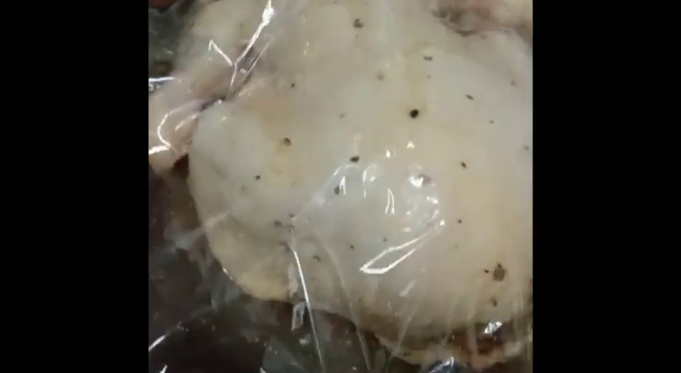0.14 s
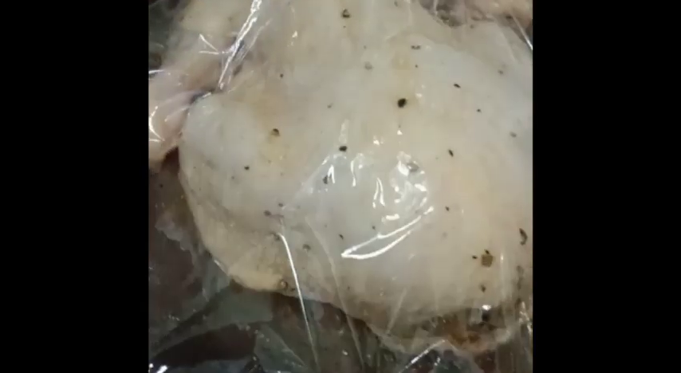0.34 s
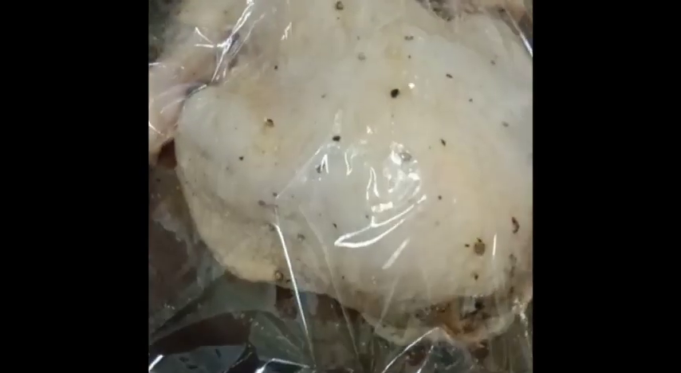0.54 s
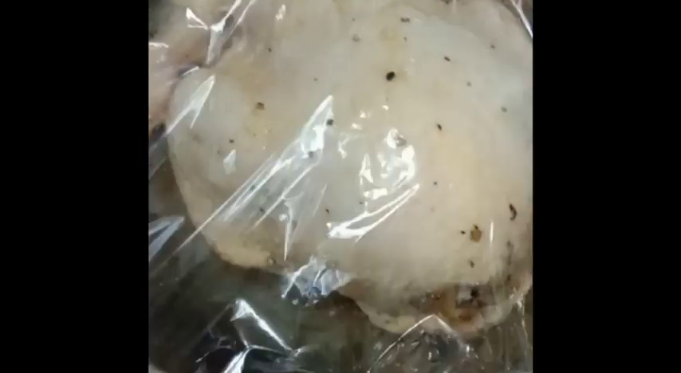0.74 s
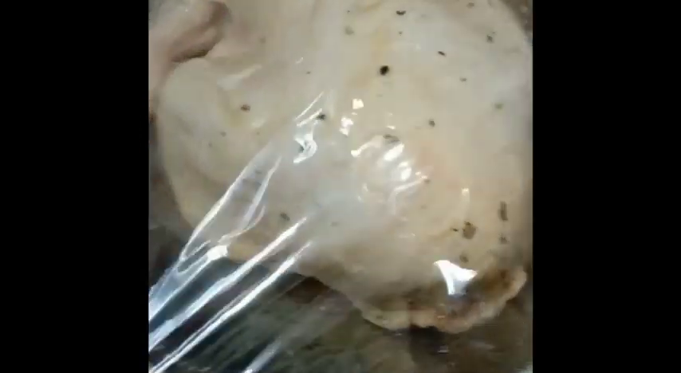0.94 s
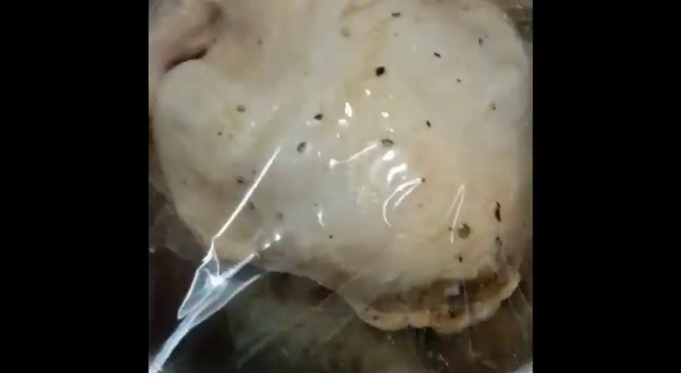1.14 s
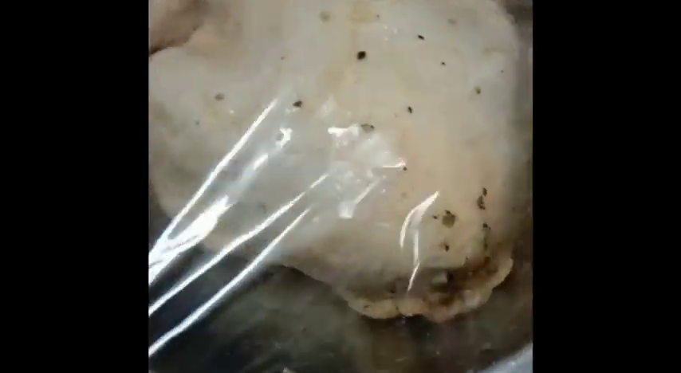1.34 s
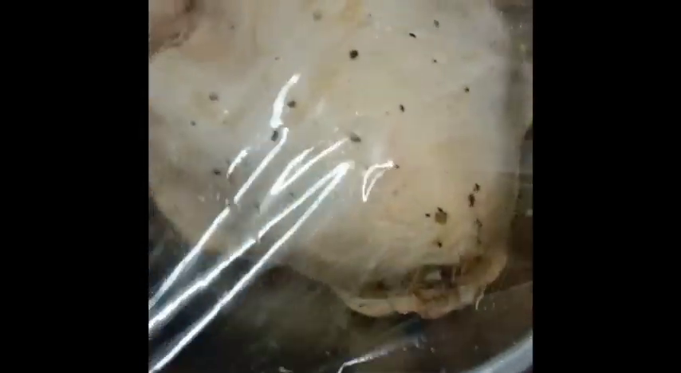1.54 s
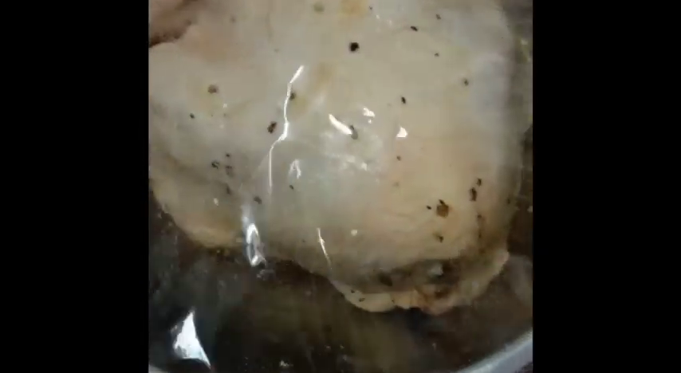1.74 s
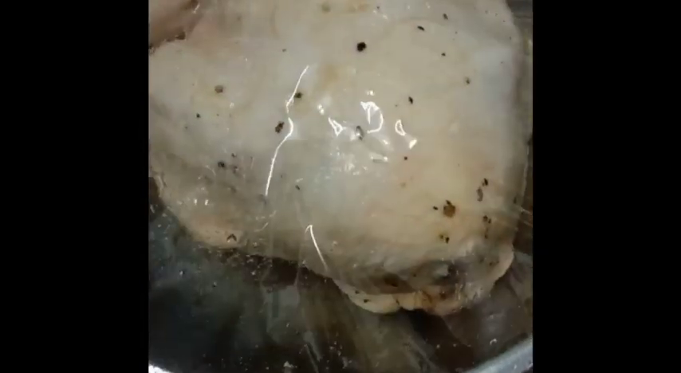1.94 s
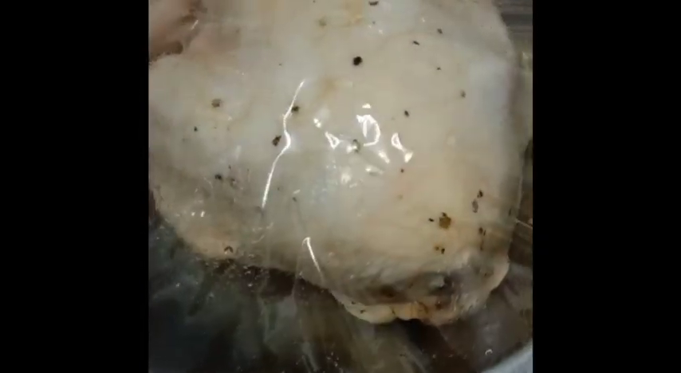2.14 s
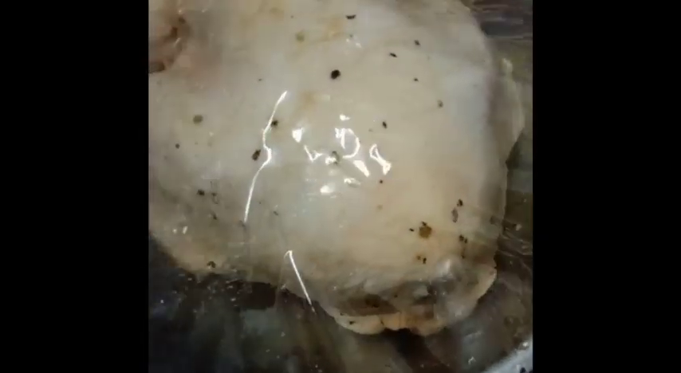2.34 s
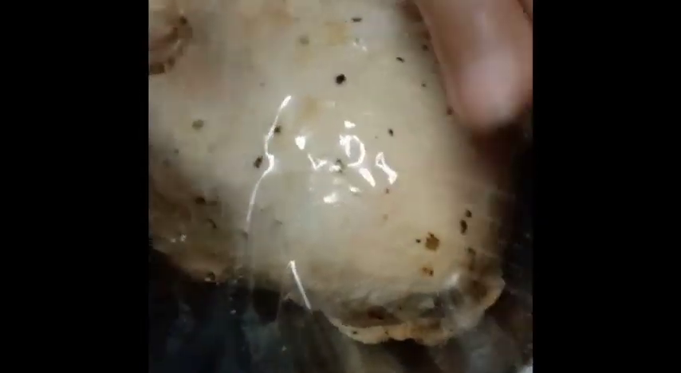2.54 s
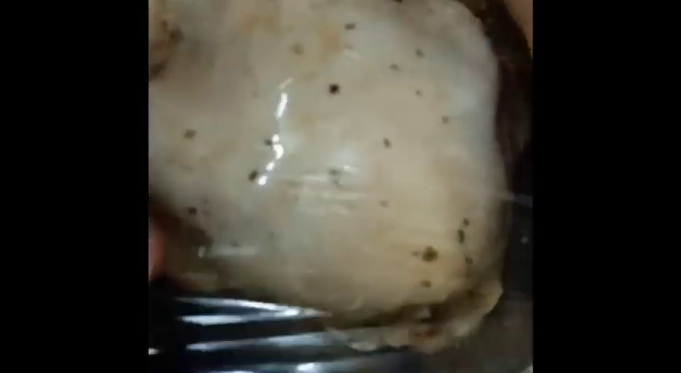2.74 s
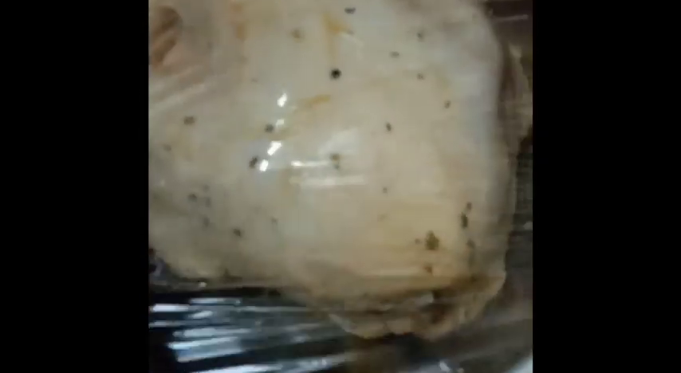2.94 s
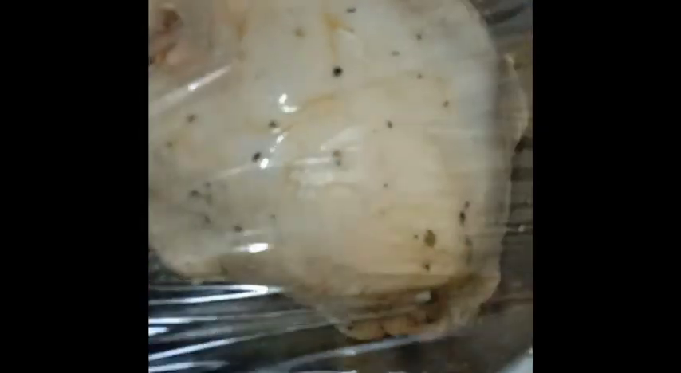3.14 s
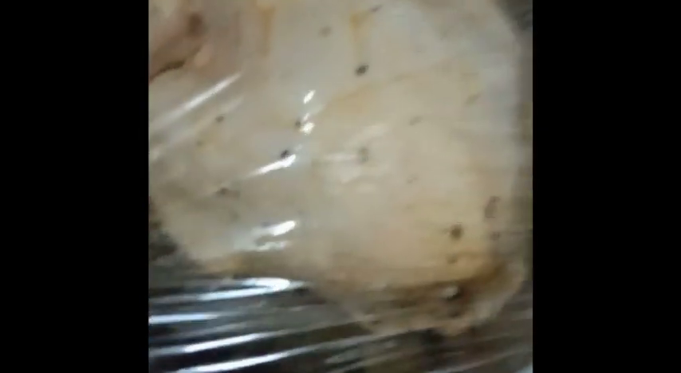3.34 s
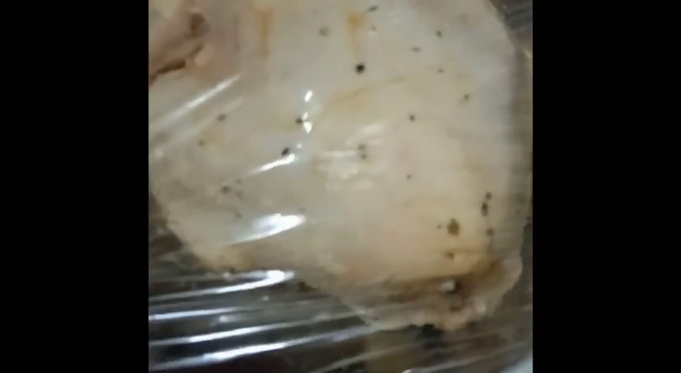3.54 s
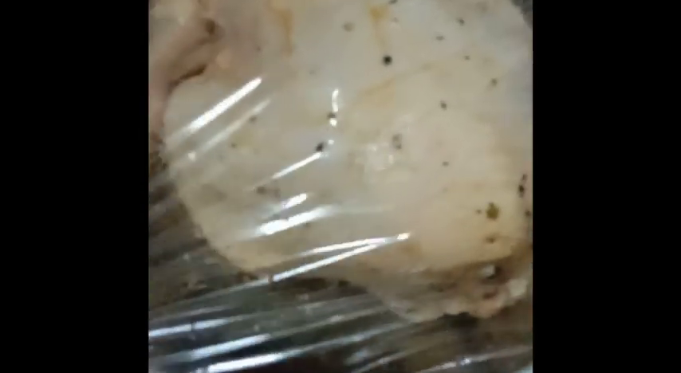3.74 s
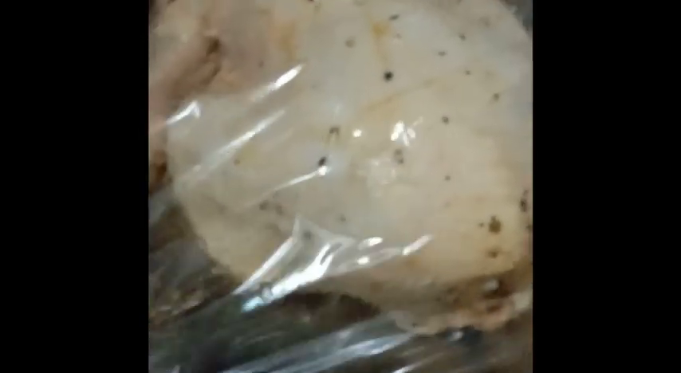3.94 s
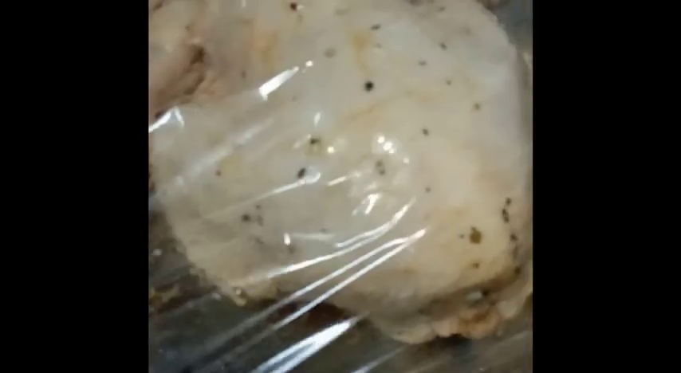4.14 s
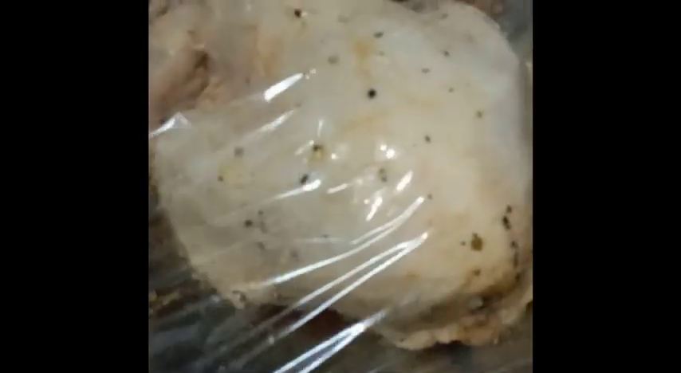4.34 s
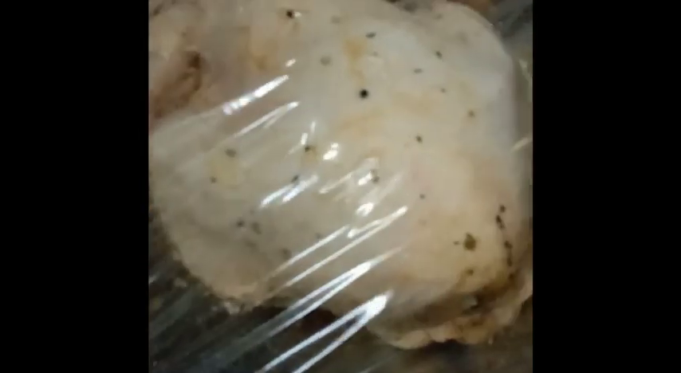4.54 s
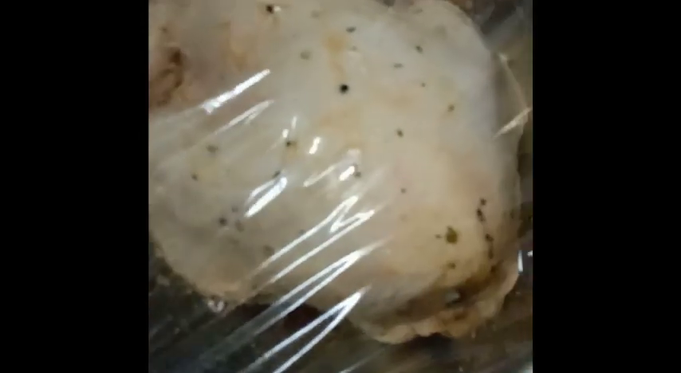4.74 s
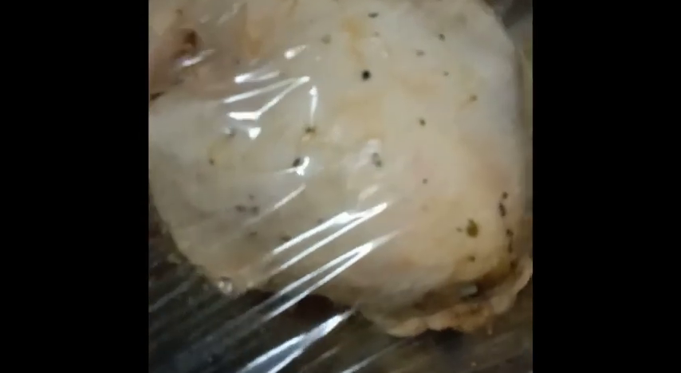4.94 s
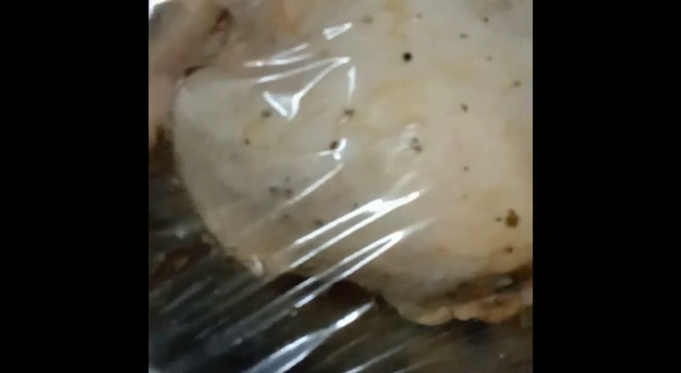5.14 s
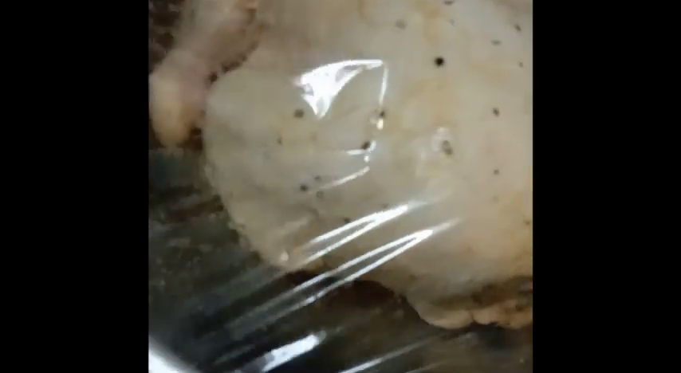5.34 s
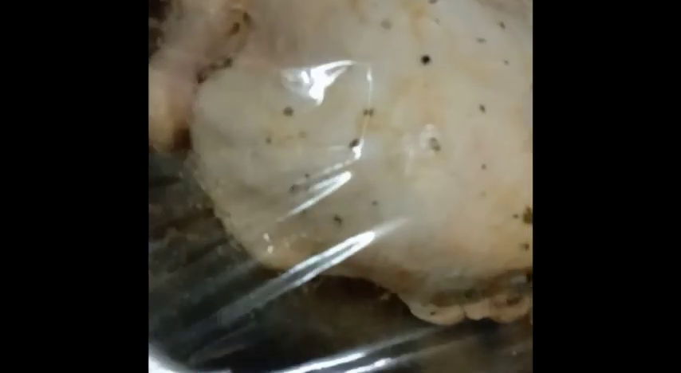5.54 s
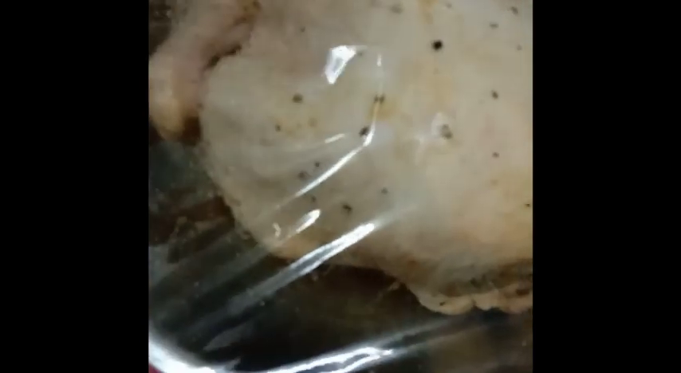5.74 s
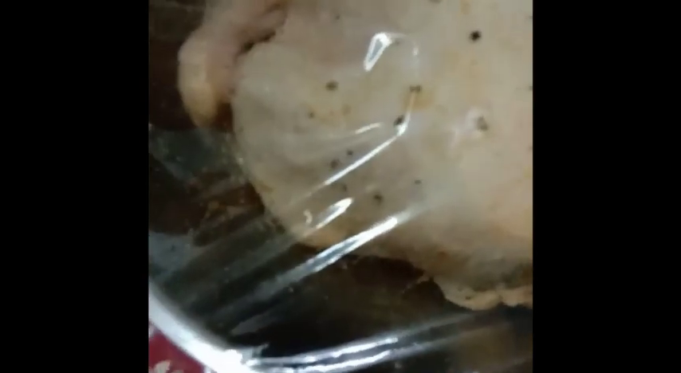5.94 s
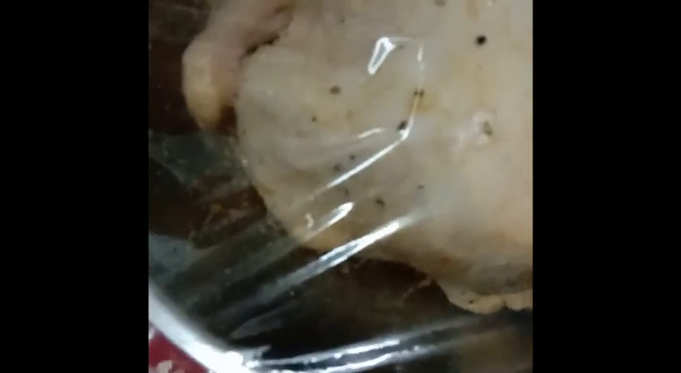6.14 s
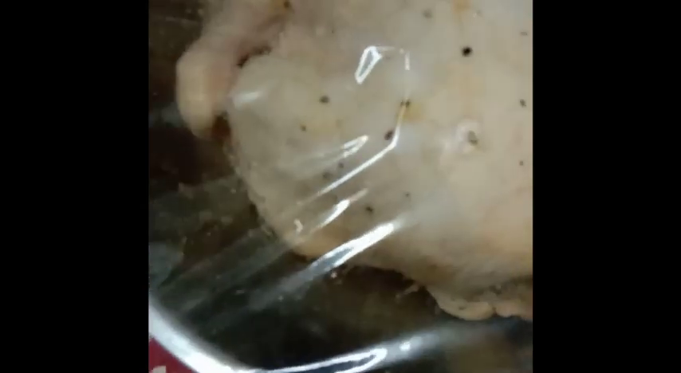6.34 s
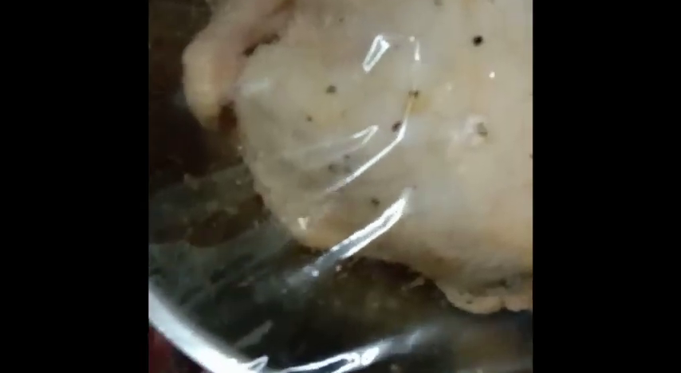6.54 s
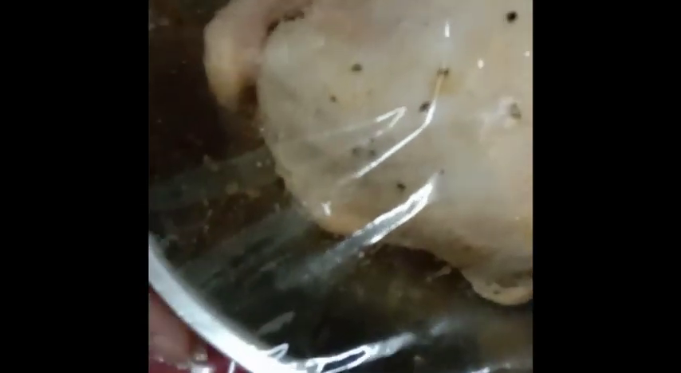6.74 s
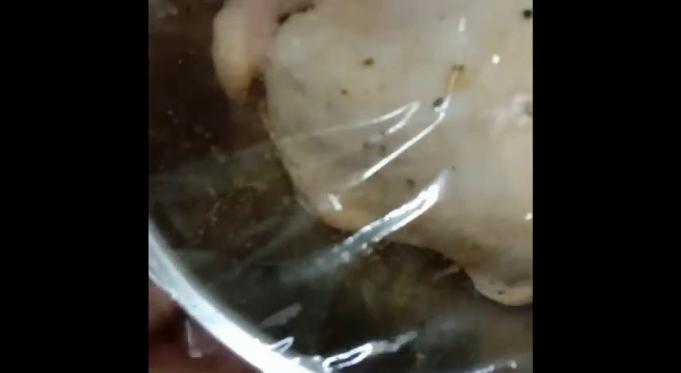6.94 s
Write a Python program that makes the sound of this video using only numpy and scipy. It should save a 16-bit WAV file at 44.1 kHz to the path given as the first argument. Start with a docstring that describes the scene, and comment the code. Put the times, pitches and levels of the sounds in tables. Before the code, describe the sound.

Plastic cling film is pulled over a metal bowl, close by in a small, quiet kitchen. It crinkles in swarms of tiny ticks and sharp snaps, with a hollow, papery ring from the taut sheet. After a lull of about a second, the pulls come thick and fast, with short peeling rasps, brief squeaks on the rim and faint bumps of the bowl. It ends mostly with crackle and snaps.

```python
"""Cling film is pulled and smoothed over a metal bowl in a small, quiet kitchen.
First, creases buckle in swarms of tiny ticks and a few loud snaps; the tight sheet answers like a
slack drum, and the hands nudge the bowl. After 1.5 s comes a lull. From about 2.8 s the pulls come
thick and fast: the bowl slides and bumps, and the clinging film peels off in short rasps or squeaks
on the rim. The last second is mostly crackle and snaps."""
import sys
import numpy as np
from scipy import signal
from scipy.fft import rfft, irfft, next_fast_len
from scipy.io import wavfile
from scipy.ndimage import uniform_filter1d, map_coordinates

SR = 44100
rng = np.random.default_rng(int(sys.argv[2]) if len(sys.argv) > 2 else 0)


def master_out(mix):
    """Clip the mix to full scale and print it as 16-bit PCM to the path in sys.argv[1]."""
    frames = np.transpose(np.atleast_2d(mix))
    ceiling = np.clip(frames, -1, 1)
    pcm = np.round(ceiling * 32767).astype(np.int16)
    wavfile.write(sys.argv[1], SR, pcm)


N = 312656
TIME = np.arange(N) / SR

# Levels in the tables are relative; the functions may turn a whole layer up or down.
# Tone of the quiet room: frequency_hz, level_db
HUSH_SPECTRUM = [(25, -23), (130, -2.5), (450, -13.5), (1300, -17.5), (2400, -29), (3000, -23),
                 (4100, -34.5), (5300, -33.5), (7200, -33), (8100, -20), (10000, -38)]
# How long the kitchen's echo takes to fade by 60 dB: frequency_hz, fade_s
ROOM_FADE = [(200, 0.057), (1000, 0.23), (5000, 0.23), (15000, 0.26)]
# Tone of the bowl rumbling on the counter: frequency_hz, level_db
RUMBLE_SPECTRUM = [(25, -25), (60, -4), (110, 4.5), (180, 0.5), (300, -6.5), (900, -55)]
# The bowl sliding on the counter: time_s, level_db
BOWL_SLIDES = [(0, -58), (.12, -56.5), (.25, -74), (2.7, -79), (2.85, -58), (3.15, -62.5), (3.42, -45.5),
               (3.62, -68), (3.75, -54), (4.3, -65), (7.09, -70)]
# The bowl bumping on the counter: start_s, level_db
BOWL_BUMPS = [(.085, -53), (.59, -53), (.67, -60), (.78, -60), (.955, -49), (1.17, -62), (2.84, -55),
              (3.25, -49), (3.385, -49), (3.86, -51), (5.033, -49), (5.09, -54), (5.185, -54)]
# The sheet's modes (the pitches it rings at): multiple_of_lowest_pitch
SHEET_MODES = [1, 1.28, 1.6, 1.9, 2.25, 2.7, 3.3, 4.1, 5.3]
# The bowl favours the sheet's middle modes: frequency_hz, level_db
DRUM_SPECTRUM = [(300, -4), (500, -25), (850, -3), (1400, 8.5), (2000, -1), (3000, -10)]
# Tone of one tick of film: frequency_hz, level_db
TICK_SPECTRUM = [(200, -55.5), (600, -36.5), (1200, -23), (2000, -22.5), (2500, -18), (3200, -2.5),
                 (4100, -9.5), (4800, 4), (5700, 8), (7800, 2.5), (9800, -3), (13000, -1.5), (15500, 2.5)]
# Tight film slipping on the rim: start_s, length_s, first_pitch_hz, last_pitch_hz, level_db
RIM_SQUEAKS = [(0.746, 0.125, 720, 705, -65.5), (1.546, 0.24, 2130, 2085, -71.5),
               (3.228, 0.026, 1496, 1780, -27), (3.381, 0.0078, 6330, 3990, -15.5),
               (3.656, 0.029, 883, 970, -41), (3.674, 0.0062, 11250, 7200, -18.5),
               (3.677, 0.0205, 10900, 11100, -23), (4.303, 0.067, 1268, 1072, -42),
               (4.835, 0.02, 1160, 1110, -22.5), (5.688, 0.037, 1322, 1240, -35),
               (5.88, 0.013, 755, 860, -26.5), (6.102, 0.048, 1400, 1466, -44.5)]
# Film peeling off film or steel: start_s, length_s, crest_fraction, crackle_db, treble_db, drum_db
FILM_PEELS = [(.049, 0.084, 0.76, -34, 1, -34), (.257, 0.015, 0.32, -41, -4, -37),
              (.651, 0.015, 0.12, -36.5, -24, -65), (1.025, .065, .1, -29, 2, -30),
              (2.929, 0.037, 0.52, -49, -16, -30.5), (3.259, 0.07, 0.6, -27, 0, -26),
              (3.359, 0.041, 0.62, -24, -0.5, -33.5), (3.474, 0.042, 0.75, -23.5, -11, -30),
              (3.69, 0.051, 0.27, -29.5, 2, -34.5), (4.833, 0.065, .1, -24, -5, -27),
              (5.305, 0.042, 0.22, -27.5, 7.5, -35.5), (5.379, 0.042, .45, -30, -6, -33),
              (5.51, 0.089, 0.07, -36.5, -16, -35.5), (5.68, 0.051, 0.09, -42, -22, -35.5),
              (5.8, 0.093, 0.95, -30, -13, -31), (5.945, 0.023, 0.2, -30.5, -6, -41),
              (6.096, 0.054, .75, -36, -9, -49)]
# Single large creases snapping through: start_s, level_db
CREASE_SNAPS = [(0.0264, -15.5), (0.0386, -9.5), (0.105, -11), (0.2606, -15), (0.7498, -34.5),
                (1.3423, -29), (1.3648, -17), (1.3915, -19), (1.4163, -12.5), (1.4634, -19.5),
                (1.5386, -33.5), (1.726, -41), (2.2032, -38.5), (2.7436, -28), (2.8592, -15.5),
                (3.5349, -14), (3.5473, -8), (3.8144, -14), (3.9854, -11.5), (4.125, -26), (4.155, -16),
                (4.216, -17), (4.2707, -23), (4.451, -22), (4.652, -11.5), (4.6737, -7.5), (4.9924, -8.5),
                (5.035, -17), (5.4408, -13.5), (5.4984, -27), (6.2617, -16), (6.3234, -13.5), (6.4879, -17),
                (6.5298, -15), (6.7521, -17.5), (6.9737, -16)]
# Fine creases sound bright, broad folds dull: time_s, treble_db
CREASE_BRIGHTNESS = [(0, 5), (.4, -4.5), (1.1, -0.5), (2.0, 3), (2.9, -5.5), (3.8, 0), (5.2, 0.5),
                     (5.55, -4), (7.09, -0.5)]
# The hands hold the film tight and it crackles faintly: start_s, length_s, crackle_db, sheet_pitch_hz
HAND_GRIPS = [(0.736, 1.37, -63, 783), (2.848, 1.69, -44.5, 1003), (4.629, .97, -43.5, 1006),
              (5.683, 0.332, -43, 719), (6.086, 1.1, -50, 1270)]
# Each pull on the film: start_s, length_s, crackle_db, drum_db, sheet_pitch_hz (at the crest)
HAND_PULLS = [(-.042, .17, -25.5, -28.5, 300), (0.132, .089, -36, -38.5, 705),
              (0.247, .12, -40, -40.5, 875), (0.645, 0.12, -53.5, -70, 720), (0.831, .15, -43.5, -45, 800),
              (0.967, .12, -36.5, -35.5, 840), (1.204, .091, -42.5, -53.5, 699),
              (1.332, .066, -32, -50, 1138), (1.392, .064, -35, -40, 865), (1.483, 0.13, -50.5, -66.5, 794),
              (1.701, .184, -53.5, -74.5, 792), (1.971, .12, -56.5, -59, 791),
              (2.74, 0.12, -44.5, -47, 954), (2.839, 0.19, -29.5, -29.5, 852),
              (3.203, .22, -29.5, -29, 889), (3.482, .088, -30, -36, 614), (3.671, .16, -28.5, -33.5, 768),
              (3.845, .19, -31, -34.5, 566), (4.068, .12, -33.5, -38, 796),
              (4.402, 0.15, -35.5, -41.5, 1028), (4.618, .097, -33, -33, 669), (4.748, .27, -29, -33, 1011),
              (4.994, .161, -33, -40.5, 1172), (5.301, .156, -38.5, -38.5, 745),
              (5.515, 0.096, -49, -33, 594), (5.796, .095, -34, -29.5, 740), (5.942, .098, -41, -42.5, 664),
              (6.135, .217, -39, -46.5, 1245), (6.309, 0.15, -42.5, -41.5, 755),
              (6.391, 0.39, -36.5, -45, 1237), (6.914, .199, -36, -43, 1165)]


def gain_of(db):
    """Turns decibels into a number to multiply a sound by."""
    return 10 ** (np.asarray(db) / 20)


def evened(x):
    """Scales a sound to an average power of one."""
    return x / np.sqrt(np.mean(x ** 2) + 1e-20)


def look_up(table, hz):
    """Reads between the rows of a frequency table."""
    frequencies, values = np.transpose(table)
    return np.interp(np.log(hz + 1), np.log(frequencies), values)


def add(mix, start_s, sound):
    """Mixes a sound in at the given time."""
    part = mix[max(round(start_s * SR), 0):][:len(sound)]
    part += sound[:len(part)]


def drift(n, per_s):
    """A smooth random wander that changes per_s times a second."""
    knots = rng.standard_normal(n // 16 + 4)
    return map_coordinates(knots, [np.arange(n) * per_s / SR], order=2, mode="mirror")


def noise(spectrum):
    """Steady noise with the given tone."""
    gains = gain_of(look_up(spectrum, np.fft.rfftfreq(N, 1 / SR)))
    return evened(irfft(rfft(rng.standard_normal(N)) * gains, N))


def kitchen_echo(x, echoes_per_s=4000):
    """Scattered echoes come off the counter and walls; the bass fades first."""
    n = SR // 2
    echoes = rng.standard_normal(n) * (rng.random(n) < echoes_per_s / SR) * (TIME[:n] > .002)
    hz, t, bands = signal.stft(echoes, SR, nperseg=256)
    fade = gain_of(-60 * t / look_up(ROOM_FADE, hz)[:, None])
    tail = signal.istft(bands * fade, SR, nperseg=256)[1]
    return signal.fftconvolve(x, tail / np.linalg.norm(tail))[:N]


def with_bowl_echo(x, echo_db=-11, fade_s=0.0081, size=1024):
    """Sound bounces between the steel walls for a few milliseconds and softens every tick."""
    t = np.arange(size) / SR
    echoes = rng.standard_normal(size) * np.sqrt(t) * np.exp(-2 * t / fade_s)
    return x + gain_of(echo_db) * signal.oaconvolve(x, echoes / np.linalg.norm(echoes))[:N]


def bowl_nudges(rise_s=0.02, bowl_hz=105, size=8192):
    """The heavy bowl rumbles as it slides and bumps softly, a few dull cycles each time."""
    t, rumble = np.arange(size) / SR, noise(RUMBLE_SPECTRUM)
    out = gain_of(np.interp(TIME, *np.transpose(BOWL_SLIDES))) * rumble
    push = t / rise_s * np.exp(1 - t / rise_s)
    for start, level_db in BOWL_BUMPS:
        ring = np.sin(2 * np.pi * bowl_hz * rng.uniform(.85, 1.15) * t)
        add(out, start, gain_of(level_db) * push * (ring + .5 * rumble[int(start * SR):][:size]))
    return out


def resonate(x, hz, width_hz, order=2):
    """Lets a sound ring in a band around the moving pitch hz."""
    turn = np.exp(2j * np.pi * np.cumsum(hz) / SR)
    decay = np.exp(-np.pi * width_hz / SR)
    shifted = x / turn + 1e-18  # move the band down to 0 Hz, smooth it, then move it back
    for _ in range(order):
        shifted = signal.lfilter([1 - decay], [1, -decay], shifted)
    return 2 * (turn * shifted).real


def sheet_drum(kicks, lowest_hz, wobble=0.071, bass_cut_hz=400):
    """The stretched sheet rings in modes that slide with its tension, and gives off almost no bass."""
    hz = lowest_hz * np.exp(wobble * drift(len(kicks), 45))
    out = gain_of(-13) * resonate(kicks, hz * .5, width_hz=470)  # loose folds beside the tight part
    power = 0
    for ratio in SHEET_MODES:
        # the lowest mode stands out less as the sheet tightens
        width_hz, boost_db = (220, 5 * np.log2(1500 / hz)) if ratio == 1 else (470, 0)
        gain = gain_of(look_up(DRUM_SPECTRUM, hz * ratio) + boost_db)
        out += gain * resonate(kicks, hz * ratio, width_hz, order=3)
        power += gain ** 2 * width_hz
    bass_cut = signal.butter(5, bass_cut_hz, "high", fs=SR, output="sos")
    return evened(signal.sosfilt(bass_cut, out / np.sqrt(power)))


def tick(pitch_hz, ring_db, width_octaves=0.28, size=512):
    """One facet (a tiny flat patch of film) flips over with a click that favours its own pitch."""
    hz = np.fft.rfftfreq(size, 1 / SR)
    octaves_away = np.log2((hz + 1) / pitch_hz)
    db = look_up(TICK_SPECTRUM, hz) + ring_db * np.exp(-.5 * (octaves_away / width_octaves) ** 2)
    log_gain = np.log(gain_of(np.r_[db, db[-2:0:-1]]))
    click = np.fft.ifft(np.exp(np.conj(signal.hilbert(log_gain)))).real  # sharp start, then a fade
    return click / np.linalg.norm(click)


def facet_crackle(kicks, treble_db, count=16, treble_hz=9000):
    """Each kick flips one of many facets; treble_db turns the highest octave up or down."""
    n = len(kicks)
    facet = rng.integers(0, count, n)[np.arange(n) // 64]
    ticks = sum(signal.oaconvolve(kicks * (facet == k), tick(hz, ring_db=12))[:n]
                for k, hz in enumerate(np.geomspace(3000, 15000, count)))
    size = next_fast_len(n + 512)
    hz = np.fft.rfftfreq(size, 1 / SR) + 1
    treble = irfft(rfft(ticks, size) / (1 + (treble_hz / hz) ** 8), size)[:n]
    power = 0.55 + 0.25 * gain_of(2 * treble_db)
    return (ticks + (gain_of(treble_db) - 1) * treble) / np.sqrt(power)


def buckles(n, per_s, spread_db, largest=3.7):
    """Random kicks, many small and a few large, that release energy at an even pace."""
    kicks = (rng.random(n) < per_s / SR) * rng.choice([-1, 1], n)
    kicks = kicks * gain_of(spread_db * np.minimum(rng.exponential(1, n), largest))
    nearby_power = abs(uniform_filter1d(kicks ** 2, 1500))
    return kicks / np.sqrt(nearby_power + 1e-6)


def crease_collapse(rise_s=0.00028, settle_s=0.0041, settle=0.24, size=512):
    """A crease gives way in under a millisecond, then its neighbours settle."""
    t = np.arange(size) / SR
    return t / rise_s * np.exp(1 - t / rise_s) + settle * np.exp(-t / settle_s)


def squeaks(waver=0.0316, flutter=0.52):
    """The film sticks and slips on the rim, making a brief, unsteady gliding tone."""
    out = np.zeros(N)
    for start, length, first_hz, last_hz, level_db in RIM_SQUEAKS:
        n = int(length * SR)
        slip, grip = drift(n, first_hz / 6), drift(n, first_hz / 6)
        hz = np.geomspace(first_hz, last_hz, n) * (1 + waver * slip)
        tone = np.sin(2 * np.pi * np.cumsum(hz) / SR) * (1 + flutter * grip)
        add(out, start, gain_of(level_db) * evened(tone * signal.windows.tukey(n, .7)))
    return out


def peels(sheet_hz, slips_per_s=3500):
    """Clinging film lets go in a dense run of slips that swells to a crest and stops."""
    out = np.zeros(N)
    for start, length, crest_fraction, crackle_db, treble_db, drum_db in FILM_PEELS:
        crest, end = start + crest_fraction * length, start + length
        t = np.arange(start - .005, end + 0.022, 1 / SR)
        swell = np.interp(t, [start - .001, start, crest, end, end + 0.0053], [0, .31, 1.4, .31, 0])
        slips = buckles(len(t), slips_per_s, spread_db=0.5)
        rasp = gain_of(crackle_db) * facet_crackle(slips, treble_db)
        drum = gain_of(drum_db) * sheet_drum(slips, np.interp(t, TIME, sheet_hz))
        add(out, t[0], swell * (rasp + drum))
    return out


def snaps(sheet_hz, trim_db=-2, drum_db=-29, typical_hz=7000, scatter_octaves=0.15, size=1024):
    """A large crease snaps with a pitch of its own and taps the sheet."""
    out = np.zeros(N)
    for start, level_db in CREASE_SNAPS:
        kicks = crease_collapse(settle=.14, size=size) * rng.choice([-1, 1], size)
        pitch_hz = typical_hz * 2 ** (scatter_octaves * rng.standard_normal())
        click = np.convolve(kicks, tick(pitch_hz, ring_db=3))[:size]
        tap = gain_of(drum_db) * sheet_drum(kicks, np.interp(start, TIME, sheet_hz))
        add(out, start, gain_of(level_db + trim_db) * (click / abs(click).max() + tap))
    return out


def held(since_s, length_s, catch_s=.009, release_db_per_s=314.5):
    """The film catches quickly, stays under load, then settles when let go."""
    release = gain_of(-release_db_per_s * np.clip(since_s - length_s, 0, .5))
    return np.clip(since_s / catch_s, 0, 1) * release


def hands(crest_fraction=.41, swell_db=11, ease_db=6.5, sink_octaves=.22):
    """Grips and pulls add up to crackle and drum levels; the strongest leads the sheet's pitch."""
    t, moves = TIME[::32], []
    for start, length, crackle_db, hz in HAND_GRIPS:
        effort = held(t - start, length)
        drum_db = crackle_db - 6.5
        moves.append((gain_of(crackle_db) * effort, gain_of(drum_db) * effort, np.full(len(t), hz)))
    for start, length, crackle_db, drum_db, hz in HAND_PULLS:
        progress = np.clip((t - start) / length, 0, 1)
        swell = gain_of(np.interp(progress, [0, crest_fraction, 1], [-swell_db, 0, -ease_db]))
        effort = held(t - start, length) * swell
        sinking_hz = hz * 2 ** (sink_octaves * (crest_fraction - progress))  # the film yields
        moves.append((gain_of(crackle_db) * effort, gain_of(drum_db) * effort, sinking_hz))
    crackle, drum, pitch = np.swapaxes(moves, 0, 1) + 1e-6
    crackle_db, drum_db = (20 * np.log10(np.linalg.norm(x, axis=0)) for x in (crackle, drum))
    sheet_hz = np.average(pitch, axis=0, weights=drum ** 2)
    return [np.interp(TIME, t, curve) for curve in (crackle_db, drum_db, sheet_hz)]


def crinkle(crackle_db, drum_db, sheet_hz, rustle_db=-7, rub_db=-5, clump_db=3, drum_trim_db=-1):
    """Creases buckle in clumps, faster the harder the film is worked, over a rustle of film on film."""
    creases_per_s = 650 * gain_of(0.19 * (crackle_db + 40.5))
    creases = buckles(N, creases_per_s, spread_db=3.8, largest=4.2)
    energy = abs(signal.oaconvolve(creases ** 2, crease_collapse() ** 2)[:N])
    strength = np.sqrt(energy / energy.mean() + gain_of(2 * rustle_db))
    kicks = evened(strength * rng.standard_normal(N) * gain_of(clump_db * drift(N, 70)))
    treble_db = np.interp(TIME, *np.transpose(CREASE_BRIGHTNESS))
    crackle = facet_crackle(kicks * gain_of(crackle_db), treble_db)
    rub = gain_of(rub_db) * rng.standard_normal(N)  # dragging over the rim also drives the sheet
    return crackle + gain_of(drum_db + drum_trim_db) * sheet_drum(kicks + rub, sheet_hz)


def scene(room_db=-9, hush_db=-75):
    """The film and the bowl in a quiet kitchen, in one channel."""
    crackle_db, drum_db, sheet_hz = hands()
    film = with_bowl_echo(crinkle(crackle_db, drum_db, sheet_hz) + peels(sheet_hz))
    film += snaps(sheet_hz) + squeaks()
    echo = gain_of(room_db) * kitchen_echo(film)
    return (film + echo + bowl_nudges() + gain_of(hush_db) * noise(HUSH_SPECTRUM))[None]


def record(dry, cutoff_hz=15800):
    """Cuts away the very highest treble."""
    low_pass = signal.firwin(401, cutoff_hz, window=("kaiser", 8), fs=SR)
    return signal.oaconvolve(dry, low_pass[None], "same")


dry = scene()
out = record(dry)
master_out(out)
```